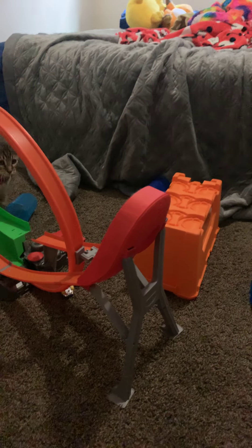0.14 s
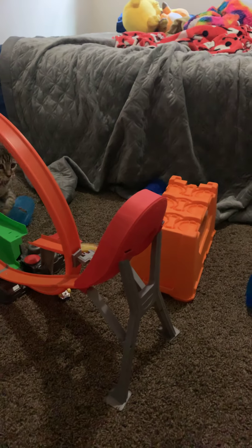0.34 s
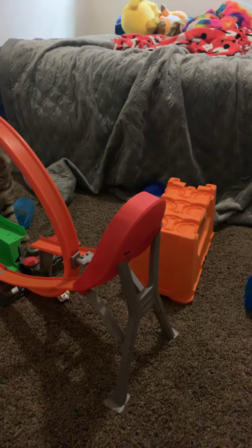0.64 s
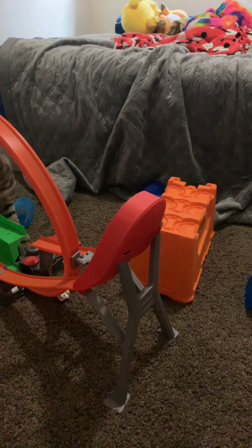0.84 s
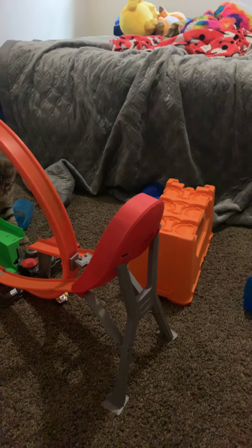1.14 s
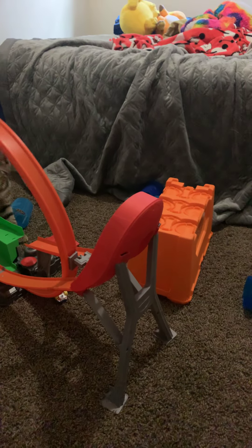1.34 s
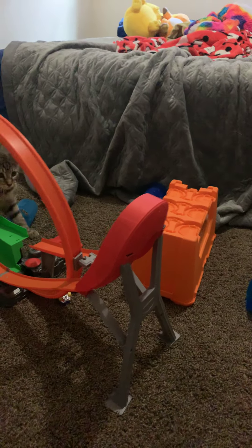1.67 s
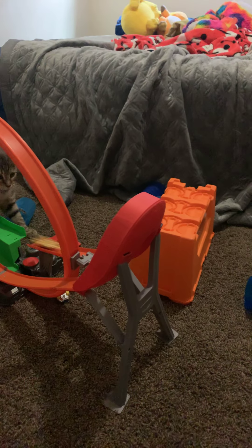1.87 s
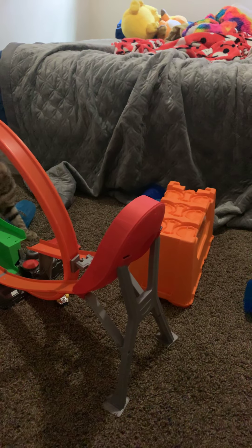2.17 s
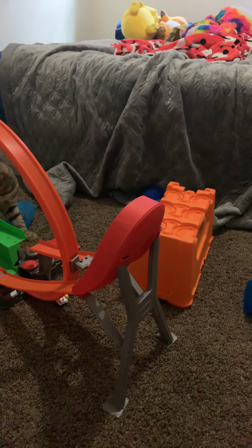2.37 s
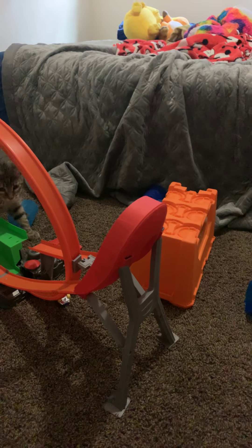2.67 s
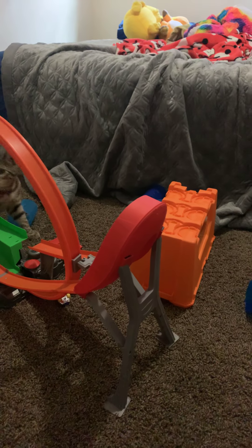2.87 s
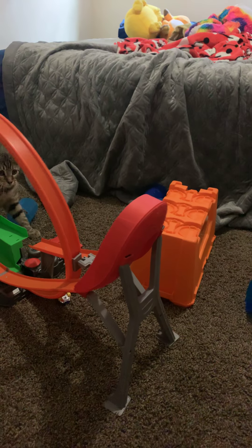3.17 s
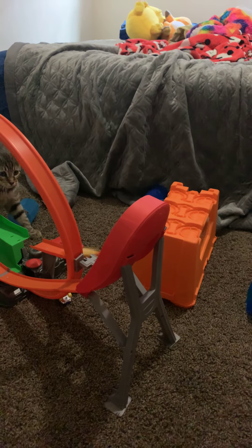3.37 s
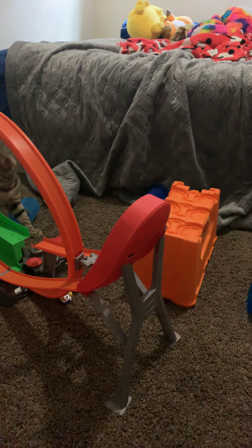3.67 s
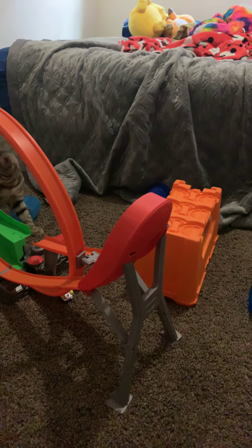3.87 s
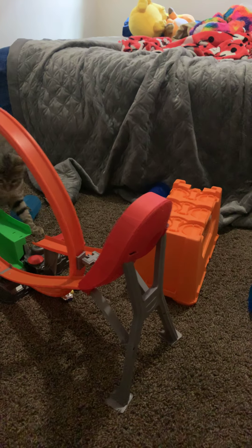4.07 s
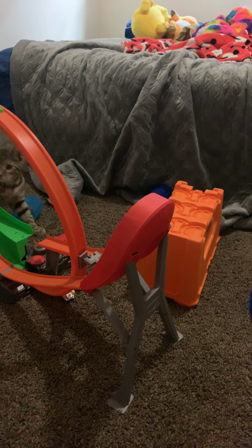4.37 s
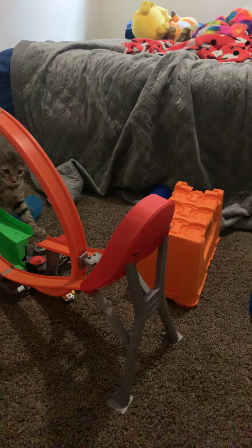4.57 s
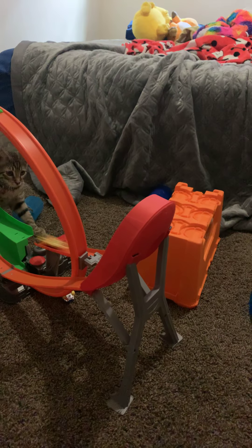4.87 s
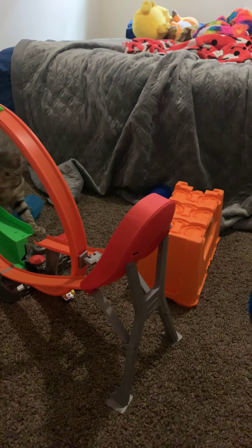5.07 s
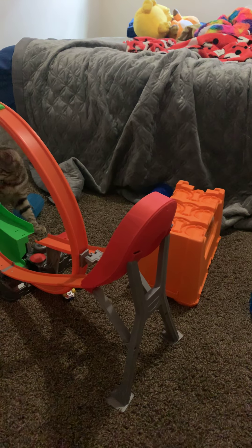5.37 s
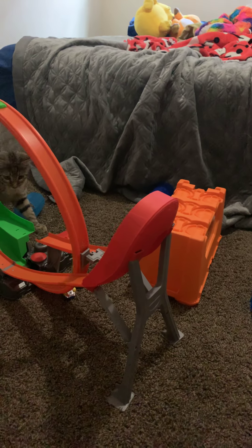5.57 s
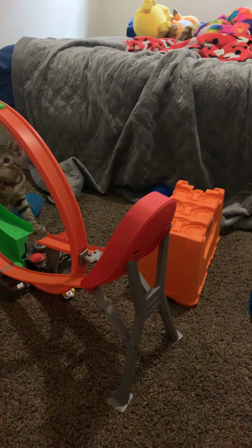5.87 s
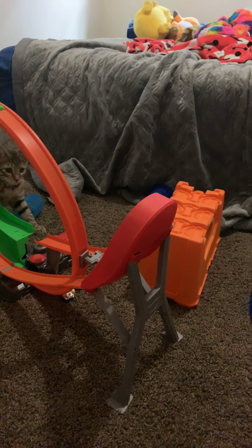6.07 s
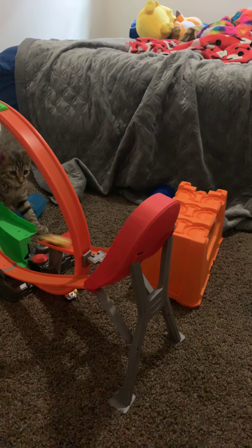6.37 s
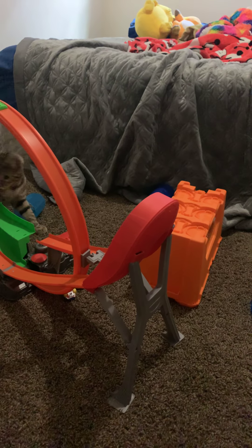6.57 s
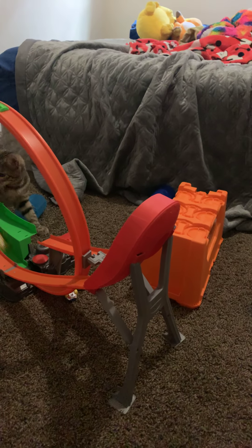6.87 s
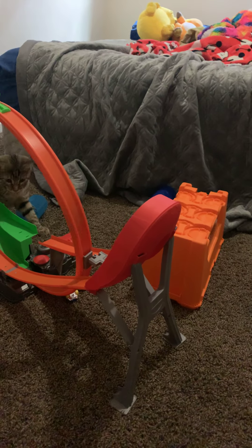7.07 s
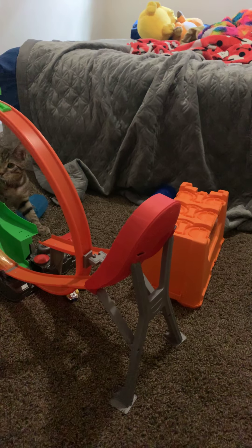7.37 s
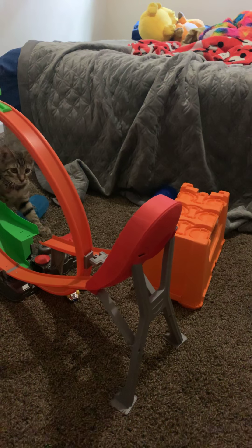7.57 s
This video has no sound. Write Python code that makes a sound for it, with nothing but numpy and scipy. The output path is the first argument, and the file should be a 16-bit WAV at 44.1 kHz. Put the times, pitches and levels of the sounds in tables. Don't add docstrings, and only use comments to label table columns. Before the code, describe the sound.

Continuous fast gear ticking from a toy track booster, bright and dry, runs beneath a metal car making repeated laps. Hard wheels give a gritty plastic clatter that swells and thins with each section, broken by crisp double clicks at the joints, hollow thuds on landing and bursts of rattling in the booster. Near, mono indoor sound with quiet room air, brief reflections and soft low bumps through the floor.

```python
import sys
import numpy as np
from scipy import signal
from scipy.fft import rfft, irfft
from scipy.io import wavfile
from scipy.ndimage import uniform_filter1d

SR = 44100
rng = np.random.default_rng(int(sys.argv[2]) if len(sys.argv) > 2 else 0)


def linear_from_db(decibels):
    return 10 ** (np.asarray(decibels, float) / 20)


def waveform_to_disk(signal):
    frames = np.transpose(np.atleast_2d(signal))
    scaled = np.clip(frames, -1, 1) * 32767
    samples = np.round(scaled).astype(np.int16)
    wavfile.write(sys.argv[1], SR, samples)


N = 340672
T = np.arange(N) / SR
HZ = np.fft.rfftfreq(N, 1 / SR) + 1
LAP_S = 1.48

# f/Hz, level/dB
ROOM_TONE = [(25, -17), (80, -3.5), (150, -15), (394, -15), (1000, -16), (4000, -13.5), (10000, -22),
             (16000, -27)]
# t/s, level/dB
FLOOR_THUMPS = [(0.51, -41), (0.969, -44), (2.01, -45), (2.28, -46), (3.552, -39), (4.449, -40),
                (5.001, -45), (5.579, -55), (.19, -36), (3.2, -39), (3.975, -53), (4.68, -42), (5.46, -54),
                (6.164, -36), (6.557, -34), (7.031, -45), (7.639, -49)]
# t/s, level/dB
GEAR_LEVEL = [(0.0, -36.5), (1.6, -35.5), (3.2, -36.5), (4.6, -36), (5.35, -38), (6.0, -36), (6.8, -37.5),
              (7.72, -35.5)]
# t/s, level/dB
GEAR_SLIPS = [(0.829, 2), (0.905, 5), (2.314, -3), (2.341, 6), (3.815, 2), (3.866, 8), (5.339, -13),
              (6.446, 8), (6.85, 1), (6.879, 6)]
# f/Hz, width/Hz, level/dB
GEAR_TEETH = [(5150, 250, -9), (5600, 300, -6), (5960, 170, 0), (6580, 110, 0), (9600, 400, -20)]
# f/Hz, width/Hz, level/dB
HOUSING = [(503, 17, -2), (621, 33, 2.5), (729, 150, -3.5), (943, 37, -7.5), (1003, 31, -10),
           (1568, 67, -13), (3000, 1000, -20)]

JOINT_AT_S = [
    0,
    .418,
    .58,
    .75,
    .92,
    1.05,
    1.2,
    1.37,
]
# t/s at landing, crest, loop, bend
OUT_S = [(-.41, .0176, .1708, .3404), (1.0789, 1.498, 1.6596, 1.8267), (2.5414, 3.017, 3.1966, 3.3722),
         (4.0875, 4.5, 4.659, 4.833), (5.5598, 5.9928, 6.1594, 6.322), (7.0269, 7.468, 7.6355, 7.8)]
# t/s at booster mouth, booster exit, top of jump, step
HOME_S = [(.5132, .6523, .8, .9728), (1.9999, 2.123, 2.3, 2.461), (3.547, 3.681, 3.81, 3.9725),
          (4.9972, 5.118, 5.29, 5.4834), (6.4962, 6.6494, 6.765, 6.9207), (7.97, 8.1, 8.25, 8.42)]
OUT_FORCE_DB = [(0.23, 0.78, -1.5, 1), (-0.21, 1.7, -0.31, -2), (-0.22, -1.8, -1.3, 0.3),
                (-0.24, 1.7, 1, -0.8), (0.75, -0.98, -0.37, 0.5), (.1, 0.1, 0.44, 1)]
HOME_FORCE_DB = [(.1, 0.51, -6, 0.0036), (.1, -0.13, -1.5, 0.71), (.1, 2, -1, -0.75), (.1, 0.17, -4, 3),
                 (.1, .1, 1.5, -1.1), (.1, .1, .1, .1)]

# f/Hz, front axle level/dB, rear axle level/dB, gap between axles/s, thud level/dB
JOINTS = [
    (4690, -19.5, -21, .02, -11),
    (4430, -20, -20, .0125, -6),
    (3580, -15.5, -21, .014, -9.5),
    (3620, -18, -34, .02, -21),
    (3880, -20, -23, 0.015, -14),
    (5070, -14, -24, 0.0082, -47),
    (5000, -60, -60, .01, -20),
    (5300, -19.5, -28, 0.018, -4.5),
]
OUT_KNOCK_DB = [(.1, -9, -0.5, -3.1), (1.5, 0, 1.8, 0), (-2.5, -1.5, 1, -0.5), (-11, 2, -0.5, -3),
                (-3, -3.5, 3.5, 1.5), (0, 1.5, -4, .1)]
HOME_KNOCK_DB = [(-2, -3.5, .1, -3), (1.5, 0, .1, -6), (0, 3.5, .1, 1), (-2.1, -3, .1, 2), (.3, -6, .1, -9),
                 (.1, .1, .1, .1)]
# t/s, peak level/dB, f/Hz, thud level/dB
SHAKES = [(1.09, -16, 5270, -6), (2.553, -12.5, 3000, -3), (4.0976, -18, 4970, -3),
          (5.5751, -22, 3020, -1.5), (7.0354, -16.5, 4220, -2.5), (.5366, -19, 4200, -16),
          (2.008, -20, 3130, 0), (3.571, -23, 3300, -20), (5.021, -28, 3130, -24),
          (6.5202, -16.5, 3000, -15), (5.088, -14.5, 3070, -4.5), (2.055, -19.5, 3320, 4),
          (.5851, -15.5, 4750, -1.5), (.6187, -9.5, 4640, -9), (2.069, -14, 2700, 4),
          (2.0954, -19, 3000, -14.5), (3.5799, -15.5, 3150, -46), (3.6174, -18, 2940, 1),
          (3.6531, -16, 5540, -27), (5.006, -19, 3220, -14), (5.0607, -16.5, 4770, -20),
          (6.562, -13.5, 3000, -1), (6.5966, -12.5, 5360, -31), (6.627, -17, 4190, -27)]
# t/s, peak level/dB, f/Hz
RATTLES = [(0.1276, -27, 3800), (0.2186, -16.5, 4400), (0.255, -19.5, 5000), (1.0253, -20.5, 4540),
           (1.2994, -23.5, 7700), (2.2304, -26.5, 4820), (2.439, -24.5, 5300), (2.8125, -24, 3580),
           (3.1275, -27, 3000), (3.917, -37, 4040), (3.9384, -29, 3170), (4.3057, -25.5, 3080),
           (4.3834, -28, 6100), (4.467, -32, 3880), (4.611, -33, 2960), (5.207, -24.5, 4600),
           (5.3884, -30.5, 3690), (5.4543, -21.5, 6100), (5.7887, -25.5, 5250), (5.903, -27, 3870),
           (6.0174, -23, 4070), (6.0995, -31, 4510), (7.5832, -34, 3580)]

# from t after landing/s, to t after landing/s, f/Hz, width/Hz, level against the broad chatter/dB
PIECES = [(0.057, 0.071, 3230, 250, -6), (0.037, 0.054, 1070, 220, -5), (0.36, 0.12, 7200, 390, -26),
          (.07, .22, 2520, 190, -4.5), (.28, .4, 2470, 240, -6.5), (.92, 1.06, 3050, 120, -9),
          (1.03, 1.17, 4620, 110, -12), (0.033, 0.334, 3780, 150, -12), (.32, 0.382, 4200, 320, -2),
          (0.38, 0.534, 3900, 1000, -7), (0.34, 0.67, 3080, 58, -15), (0.52, 0.576, 1666, 145, -10.5),
          (0.63, 0.62, 3640, 270, -6), (0.6, 0.66, 1140, 260, -16.5), (0.77, 0.67, 4200, 93, -12),
          (.58, 0.694, 5700, 700, -10.5), (.99, 1.02, 872, 130, -10), (1.37, 1.4, 5500, 180, -6),
          (.92, 0.69, 3100, 1000, 5)]
# f/Hz, level/dB
PLASTIC = [(88, -18), (150, -16.5), (398, -13.5), (624, 3), (675, -2.5), (854, -2), (1340, -11),
           (3040, -2.5), (4490, -1), (10400, -6.5), (16000, -20.5)]
LOAD_AT_S = [.001, .014, .11, .25, .31, .43, .5, .548, .635, .75, .919, .922, .943, .947, 1.07, 1.165,
             1.369, 1.373]
# load level/dB, hollowness level/dB, loose edge level/dB, axle fizz level/dB
LOAD = [(-38, -14, -4, -8.5), (-28, -7, -10.5, -2), (-38.5, -11, -8.5, -4.5), (-40.5, -11, -12, -5),
        (-36.5, -10.5, -13.5, -3), (-34, -6.5, -6, -3.5), (-37.5, -17.5, -9.5, -3.5),
        (-29, -19, -10.5, -7.5), (-32, -11.5, -9.5, -2.5), (-37, -16.5, -6, -8.5), (-47.5, -4.5, -8.5, 0),
        (-37, 2, -10, -41), (-39, -9.5, -8, -7), (-31, -8.5, -7.5, -4), (-34, -8, -3.5, 0),
        (-50.5, -6, -9, -7.5), (-39, -13.5, -6.5, -3.5), (-35, -7, -8.5, -4.5)]


def unit(x):
    return x / np.sqrt(np.mean(x ** 2))


def colour(x, points):
    hz, db = np.transpose(points)
    return irfft(rfft(x) * linear_from_db(np.interp(np.log(HZ), np.log(hz), db)), N)


def band(x, lo_hz, hi_hz, order=3):
    return signal.sosfilt(signal.butter(order, [lo_hz, hi_hz], "band", fs=SR, output="sos"), x)


def ring(x, modes):
    out = np.zeros(N)
    for hz, width_hz, db in modes:
        b, a = signal.iirpeak(hz, hz / max(width_hz, 20), SR)
        out += linear_from_db(db) * signal.lfilter(b, a, x)
    return out


def room(x, t60_s):
    t, hop = np.arange(9000) / SR, 4096
    fade = signal.windows.hann(2 * hop, sym=False)
    x = np.pad(x, (hop, 2 * hop))
    out = np.zeros(len(x) + len(t))
    decay = np.exp(-np.log(1000) * t / t60_s) * (t > .003)
    for i in range(0, N + hop, hop):
        echo = signal.lfilter([1], [1, -.3], rng.standard_normal(len(t))) * decay
        echo /= np.sqrt(np.sum(echo ** 2))
        out[i:i + 2 * hop + len(t) - 1] += signal.fftconvolve(x[i:i + 2 * hop] * fade, echo)
    return out[hop:hop + N]


def floor():
    out = linear_from_db(-55.5) * unit(colour(rng.standard_normal(N), ROOM_TONE))
    rumble = unit(band(rng.standard_normal(N), 63, 315))
    for s, db in FLOOR_THUMPS:
        t = np.maximum(T - s, 0)
        swell = np.exp(-t / 0.036) * (1 - np.exp(-t / 0.0043))
        out += linear_from_db(db - 7.5) * rumble * swell
    return out


def booster():
    turns_per_s = 85
    gaps = (1 + .07 * rng.standard_normal(800)) * SR / turns_per_s
    turns = np.cumsum(gaps).astype(int)
    strength = linear_from_db(rng.uniform(-1.1, 1, size=800) * 2.1)
    inside = turns < N
    force = np.zeros(N)
    force[turns[inside]] = strength[inside]
    for when, db in GEAR_SLIPS:
        force[int(when * SR)] = linear_from_db(db)
    tick = unit(signal.lfilter([1], [1, -np.exp(-1 / (0.0027 * SR))], force))
    teeth = ring((tick + .5) * rng.standard_normal(N), GEAR_TEETH)
    housing = ring((np.minimum(tick, 2.5) + 1.8) * rng.standard_normal(N), HOUSING)
    s, tick_db = np.transpose(GEAR_LEVEL)
    teeth = unit(band(teeth, 2700, 12600)) * linear_from_db(np.interp(T, s, tick_db) - 9.5)
    return teeth + linear_from_db(-46) * unit(band(housing, 633, 3000))


def passes():
    when = np.hstack([OUT_S, HOME_S])
    place = np.arange(len(OUT_S))[:, None] * LAP_S + JOINT_AT_S
    return when, place, np.hstack([OUT_FORCE_DB, HOME_FORCE_DB])


def blows():
    when = passes()[0]
    hz, front_db, rear_db, gap_s, thud_db = (column + 0 * when for column in np.transpose(JOINTS))
    hz = hz * (1 + .06 * rng.standard_normal((2, *when.shape)))
    db = np.array([front_db, rear_db]) + np.hstack([OUT_KNOCK_DB, HOME_KNOCK_DB])
    rows = np.array([[when, when + gap_s], db, hz, [thud_db, thud_db]]).reshape(4, -1).T
    rows = [row for row in rows if 0 < row[0] < T[-1]]
    rattle_thud_db = -4
    return [*rows, *SHAKES, *[(*row, rattle_thud_db) for row in RATTLES]]


def knocks():
    length = 4096
    out, t = np.zeros(N + length), np.arange(length) / SR
    rows = blows()
    chance = rng.random((len(rows), 5))
    contact = 1 - np.exp(-t / .0003)
    for (s, db, hz, thud_db), c in zip(rows, chance):
        crack = band(rng.standard_normal(length), 2300, 9800, order=2)
        crack = linear_from_db(-2.5) * crack * (.95 * np.exp(-t / .0028) + .27 * np.exp(-t / .02))
        weaker = sum(np.sin(2 * np.pi * (2800 + 6000 * k) * t) for k in c[2:])
        tone = np.sin(2 * np.pi * hz * t) + 0.41 * weaker
        tone = linear_from_db(-6.0) * tone * np.exp(-t / 0.0054)
        thud = np.sin(2 * np.pi * (560 + 120 * c[0]) * t)
        thud += 0.23 * np.sin(2 * np.pi * (800 + 250 * c[1]) * t)
        thud *= linear_from_db(thud_db - 9.5) * (1 - np.exp(-t / 0.00059)) * np.exp(-t / 0.0071)
        i = int(s * SR)
        out[i:i + length] += linear_from_db(db) * (contact * (crack + tone) + thud)
    return out[:N]


def clicks(per_s, spread_db, smear_ms):
    hit = rng.random(N) < per_s / SR
    size = hit * linear_from_db(spread_db * np.minimum(rng.exponential(size=N), 5))
    tail = signal.lfilter([1], [1, -np.exp(-1000 / (smear_ms * SR))], size)
    return unit(tail * rng.standard_normal(N))


def wheels():
    when, along, force_db = passes()
    place = np.interp(T, when.ravel(), along.ravel()) % LAP_S
    load_db, body_db, edge_db, fizz_db = (np.interp(place, LOAD_AT_S, column, period=LAP_S)
                                          for column in np.transpose(LOAD))
    rail_db = load_db + np.interp(T, when.ravel(), force_db.ravel())
    chatter = clicks(per_s=1400, spread_db=-0.9, smear_ms=5.0)
    track = unit(colour(chatter, PLASTIC))
    grip_times = T[::900]
    for start, end, hz, width_hz, db in PIECES:
        on_piece = uniform_filter1d(1. * (place > start) * (place < end), size=700)
        grip = linear_from_db(3.0 * np.interp(T, grip_times, rng.standard_normal(len(grip_times))))
        track += on_piece * grip * unit(ring(chatter, [(hz, width_hz, 0)])) * linear_from_db(db)
    track /= np.sqrt(uniform_filter1d(band(track, 1400, 5780) ** 2, size=3000))
    layers = [(1960, 6680, 0, 1.0),
              (482, 1020, body_db, 0.67),
              (1218, 2186, edge_db, 3.5),
              (6280, 15000, fizz_db, -0.93),
              (88, 370, body_db, -10.5)]
    return sum(unit(band(track, lo, hi)) * linear_from_db(rail_db + db + trim_db) for lo, hi, db, trim_db in layers)


def scene():
    dry = wheels() + knocks() + booster()
    return (dry + linear_from_db(-5.5) * room(dry, t60_s=0.28) + floor())[None]


def top_cut(x):
    return signal.sosfilt(signal.butter(12, 16490, fs=SR, output="sos"), x)


def record(dry):
    x = signal.sosfilt(signal.butter(3, 45, "high", fs=SR, output="sos"), dry)
    x = signal.sosfilt(signal.ellip(10, .2, 70, 15720, fs=SR, output="sos"), x)
    return top_cut(x)


dry = scene()
out = record(dry)
waveform_to_disk(out)
```